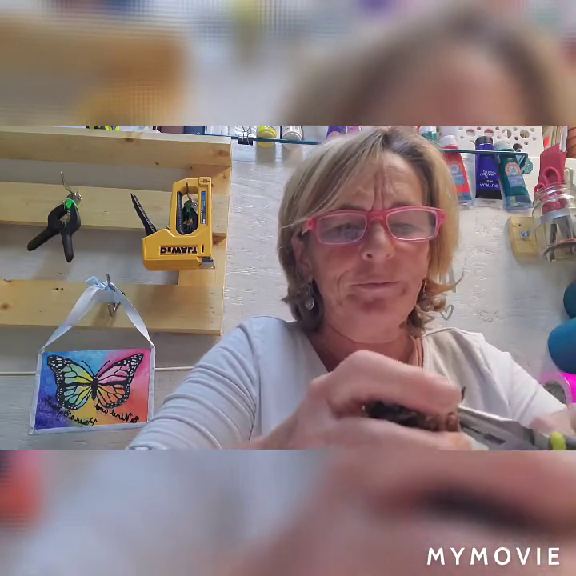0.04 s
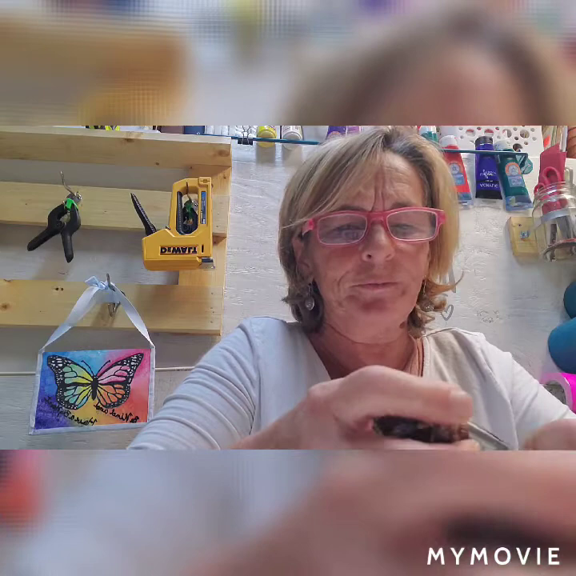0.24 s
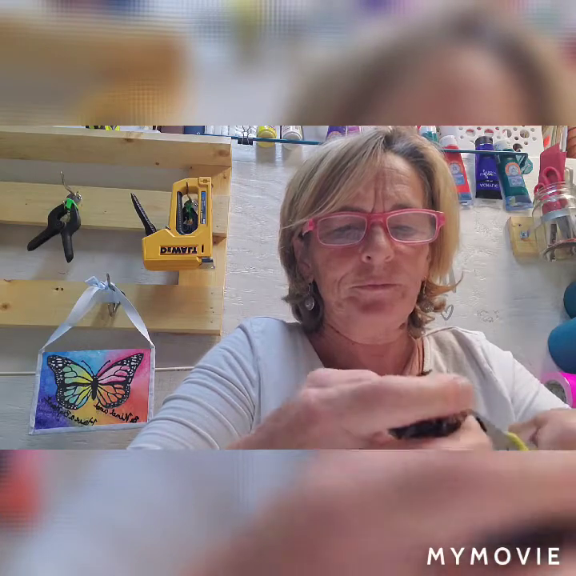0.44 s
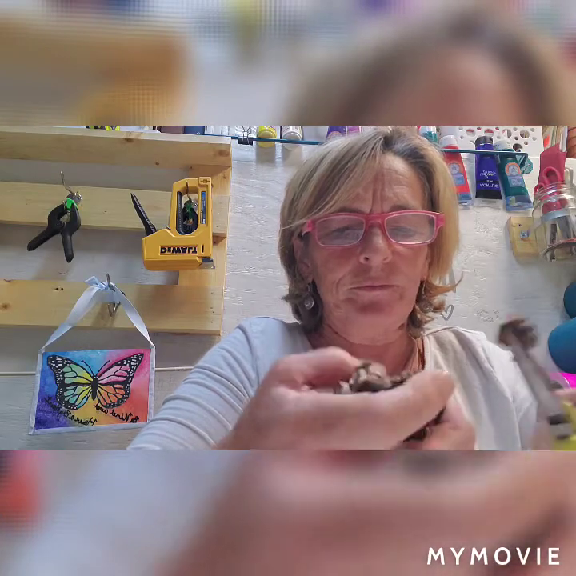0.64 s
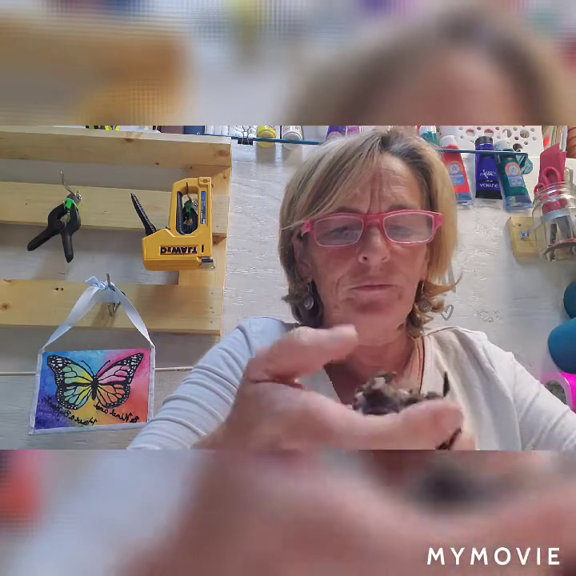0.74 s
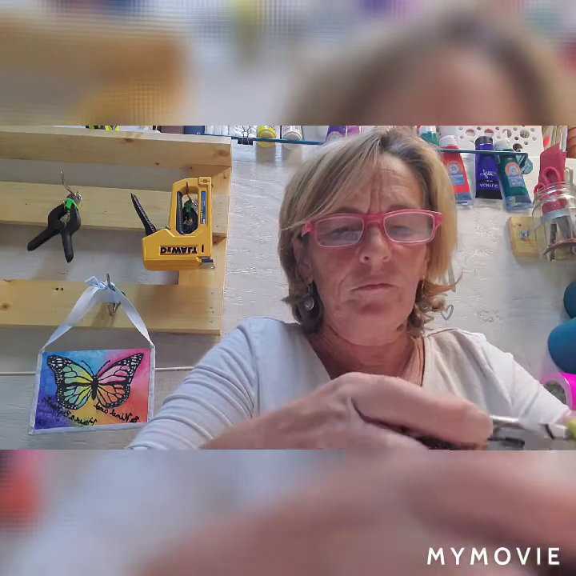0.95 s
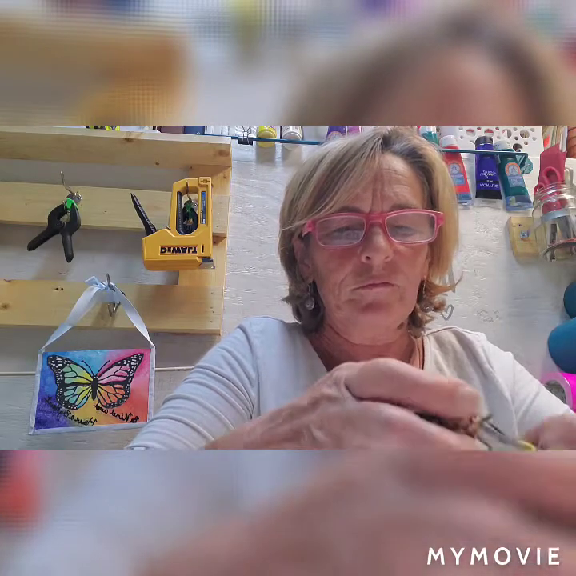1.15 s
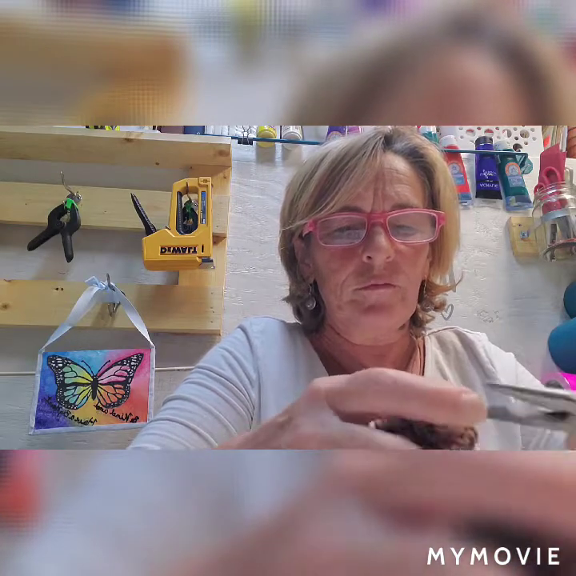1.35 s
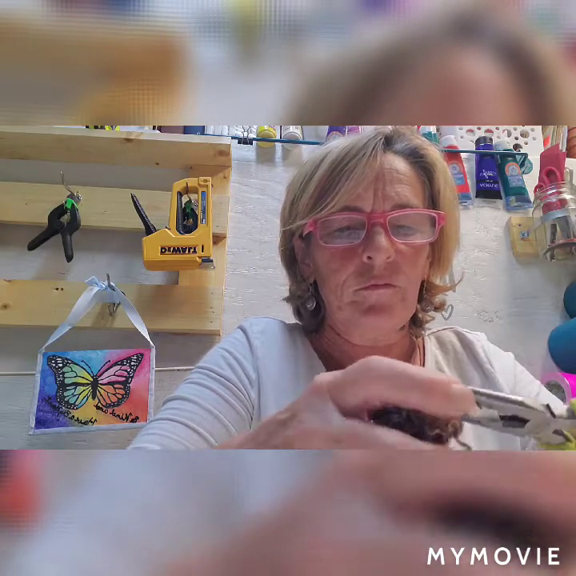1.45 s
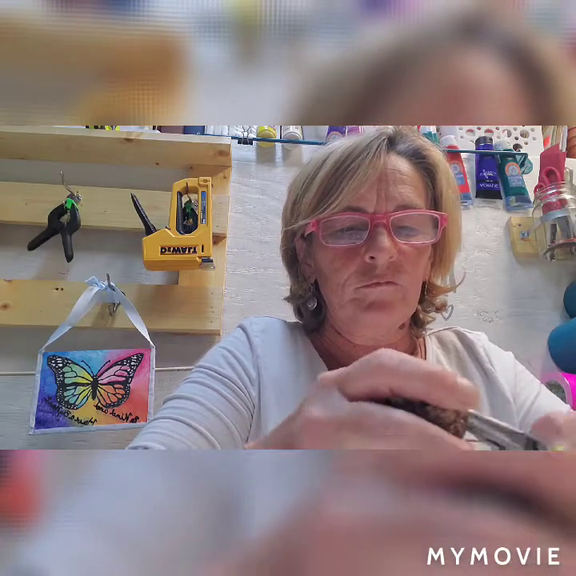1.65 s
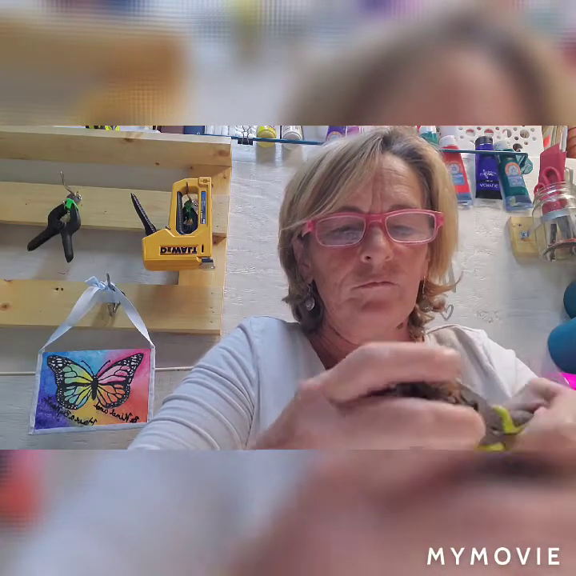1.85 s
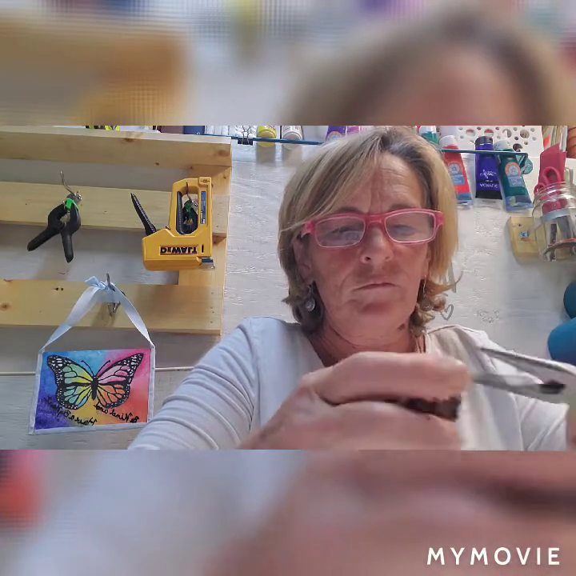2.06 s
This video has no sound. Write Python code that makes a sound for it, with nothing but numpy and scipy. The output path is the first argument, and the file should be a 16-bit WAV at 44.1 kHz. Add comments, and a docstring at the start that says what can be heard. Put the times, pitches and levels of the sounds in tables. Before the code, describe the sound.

Pliers break a dry pine cone apart with crisp woody snaps, crackling fibres and dropping scales

```python
"""Pulling a pine cone apart

Pliers pull the scales off a dry pine cone, close to the microphone in a small workroom.
Each scale gives way in snaps: short noisy bursts ringing in the woody cone, with clicking fibres between.
Loose scales drop and skitter on the bench, slightly drier than the cone, as bursts in its resonances.
Underneath lie a low motor-like hum of sines and dull room air of filtered noise."""
import sys
import numpy as np
from scipy import signal
from scipy.fft import rfft, irfft
from scipy.io import wavfile

SR = 44100
rng = np.random.default_rng(int(sys.argv[2]) if len(sys.argv) > 2 else 0)


def put_to_file(sound):
    """Save the sound as 16-bit audio at rate SR, in the file named by the first command-line argument."""
    columns = np.atleast_2d(sound).T  # one column per channel
    safe = np.clip(columns, -1, 1)
    whole_steps = np.round(safe * 32767)
    wavfile.write(sys.argv[1], SR, whole_steps.astype(np.int16))


N = 92301
T = np.arange(N) / SR  # seconds

# resonances of the fibres: centre_hz, width_hz, level_db
FIBRE_MODES = [(3080, 2300, -1.5), (4640, 220, -8.5), (6270, 770, 8), (9200, 720, -3), (10340, 640, -5.5),
               (12700, 1800, 2.5)]

PITCH_SCATTER, MODE_SCATTER_DB = 0.033, 4  # no two blows ring alike; pitch as a fraction
LEAD_S, RISE_S = 0.003, 0.00042  # time ahead of the sharp click; rise time of the noisy onset


def from_db(db):
    """Decibels to gain."""
    return 10 ** (np.asarray(db) / 20)


def rms_one(x):
    """Scale to rms 1."""
    return x / np.sqrt(np.mean(x ** 2) + 1e-20)


def energy_one(x):
    """Scale to energy 1."""
    return x / np.sqrt(np.sum(x ** 2) + 1e-20)


def add(out, start_s, x):
    """Mix x in at start_s, cut off at the end of the scene."""
    i = max(int(start_s * SR), 0)
    out[i:i + len(x)] += x[:max(N - i, 0)]


def noise(spectrum):
    """Noise with a spectrum of (Hz, dB) points; rms 1."""
    hz, db = np.transpose(spectrum)
    bin_hz = np.arange(N // 2 + 1) * SR / N
    gain = from_db(np.interp(np.log(bin_hz + 1), np.log(hz), db))
    return rms_one(irfft(rfft(rng.standard_normal(N)) * gain, N))


def resonate(x, modes, scatter=0., scatter_db=0.):
    """Parallel resonances of alternating sign, each a little off in pitch and strength if asked."""
    out = 0
    for k, (hz, width_hz, db) in enumerate(modes):
        radius = np.exp(-np.pi * width_hz / SR)  # a wider resonance dies sooner
        angle = 2 * np.pi * hz * (1 + scatter * rng.uniform(-0.68, 1)) / SR
        poles = [1, -2 * radius * np.cos(angle), radius * radius]
        mode = signal.lfilter([1, 0, -1], poles, x + 1e-18)
        gain = from_db(db + scatter_db * rng.normal())
        out = out + (-1) ** k * gain * energy_one(mode)
    return out


def blow(push, modes, db):
    """One push ringing in the modes; its whole energy equals db held for two milliseconds."""
    ring = resonate(push, modes, PITCH_SCATTER, MODE_SCATTER_DB)
    return from_db(db) * np.sqrt(0.002 * SR) * energy_one(ring)


def tuned(modes, pitch_hz):
    """The same modes on a larger or smaller scale, with the strongest at the given pitch."""
    strongest_hz = max(modes, key=lambda mode: mode[2])[0]
    return [(hz * pitch_hz / strongest_hz, width_hz, db) for hz, width_hz, db in modes]


def fracture(tear_s, share, size=1400):
    """A noisy onset swells briefly into a sharp click, LEAD_S in, and quickly dies away."""
    t = np.arange(size) / SR - LEAD_S
    envelope = np.exp(-np.abs(t) / np.where(t < 0, RISE_S, tear_s))
    push = share * rng.laplace(0, 1, size) * envelope
    push[int(LEAD_S * SR)] += 1
    return push


def clicks(length_s):
    """Random clicks of uneven size and either sign over faint noise, with time left to ring out."""
    per_s, spread_db = 650, 5
    t = T[:SR // 8]
    size_db = spread_db * np.minimum(rng.exponential(1, len(t)), 4)
    sizes = from_db(size_db) * rng.choice([-1, 1], len(t))
    born = rng.random(len(t)) < per_s / SR
    faint = 0.069 * rng.standard_normal(len(t))
    return (sizes * born + faint) * (t < length_s)


def snaps():
    """Each break excites four groups of modes, rings near its scale's pitch and leaves fibres settling."""
    # scales giving way: start_s, pitch_hz (of the ring), knock_db, crack_db, ring_db, splinter_db
    breaks = [(0.016, 6350, -31.5, -29.5, -38, -35), (0.0178, 6740, -56, -24, -23.5, -24),
              (0.087, 6230, -55, -42.5, -35, -36), (0.0985, 6000, -54, -45, -36, -34),
              (0.1248, 6120, -48, -30.5, -19, -24.5), (0.133, 6040, -42, -45, -28, -27.5),
              (0.1721, 6030, -48, -45, -29.5, -44), (0.2094, 6400, -48.5, -45, -37, -46),
              (0.254, 6200, -28, -29, -35, -23), (0.2555, 6610, -28, -23, -15.5, -25.5),
              (0.2727, 6350, -51, -39, -30.5, -30), (0.2768, 6000, -40.5, -34.5, -22.5, -33),
              (0.2868, 6330, -46, -38, -26, -35), (0.2919, 6400, -38.5, -30.5, -54, -39),
              (0.309, 6400, -39, -33, -42, -37), (0.3163, 6150, -59, -52, -24, -38),
              (0.331, 6740, -44, -35, -25.5, -33), (0.3569, 6400, -50, -51, -35, -45),
              (0.361, 6400, -37.5, -39, -26.5, -27.5), (0.366, 6500, -40, -30, -36, -26.5),
              (0.3927, 6300, -45.5, -43.5, -41, -31.5), (0.437, 6670, -28, -23.5, -25, -23.5),
              (0.4619, 6050, -42, -46, -40, -30), (0.5253, 5370, -46, -43, -31, -33),
              (0.5452, 6150, -38.5, -33, -18, -24), (0.5551, 5800, -38.5, -33, -42, -37),
              (0.5734, 7000, -31, -33, -27.5, -27.5), (0.8738, 6640, -36, -26.5, -25.5, -27.5),
              (0.9283, 6420, -46.5, -52, -29.5, -33.5), (1.049, 6300, -43, -38, -24, -27.5),
              (1.0685, 6350, -36, -26.5, -33, -28), (1.144, 6440, -31.5, -21.5, -25, -23),
              (1.16, 6840, -54, -48, -29.5, -30.5), (1.1976, 6300, -52, -38.5, -37, -39),
              (1.2203, 6200, -49, -38, -38, -38), (1.2443, 6530, -34.5, -29, -31, -30),
              (1.2513, 6230, -41, -26.5, -26.5, -37), (1.2526, 6260, -35.5, -32.5, -22, -21.5),
              (1.2914, 6800, -41, -33.5, -38, -37), (1.3211, 6350, -46, -50, -38, -32.5),
              (1.6541, 6600, -49.5, -49, -36.5, -37.5), (1.6783, 6280, -55, -59, -33, -56),
              (1.7386, 6870, -36, -35.5, -21.5, -27.5), (1.757, 6600, -34.5, -44, -38, -32),
              (1.7606, 6500, -32.5, -42, -33, -33), (1.783, 6780, -49, -42, -19, -30),
              (1.7871, 6600, -45, -35.5, -37, -40), (1.8104, 6840, -51, -42, -33, -44),
              (1.818, 6360, -44, -30.5, -28, -33), (1.8919, 6410, -50, -38.5, -26.5, -23),
              (2.0204, 6460, -57.5, -41, -28, -39)]
    # modes of the cone, from woody knock to splintering: centre_hz, width_hz, level_db
    knock = [(464, 86, -6), (866, 125, -5), (1137, 183, 1), (1498, 200, -1.5), (1885, 470, 3.5)]
    crack = [(2250, 580, -4.5), (3110, 450, 3.5), (4500, 780, 5.5)]
    scale_ring = [(5570, 910, -11), (6340, 350, 1), (7290, 1600, -8)]
    splintering = [(8420, 380, -9), (11040, 1430, -1.5), (12460, 550, 0.5), (14080, 730, 1.5),
                   (15650, 1200, -7)]
    # the splintering's highest treble against its lower part: time_s, level_db
    top_treble = [(.5, -2.5), (.87, -15), (1.05, 2.5), (1.6, -5.5), (1.78, -9), (1.89, 5)]
    top_treble_hz = 11500
    settle_s, settle_db = 0.031, -16.5  # level against the snap's splintering

    out = np.zeros(N)
    for start_s, pitch_hz, *levels_db in breaks:
        push = fracture(tear_s=0.0011, share=0.15)  # the fracture runs on after the sharp click
        top_db = np.interp(start_s, *np.transpose(top_treble))
        splinter = [(hz, width_hz, db + top_db * (hz > top_treble_hz)) for hz, width_hz, db in splintering]
        groups = (knock, crack, tuned(scale_ring, pitch_hz), splinter)
        for modes, db in zip(groups, levels_db):
            # keep the push from rumbling far below the group's lowest mode
            edge = signal.butter(3, 0.36 * modes[0][0], "high", fs=SR)
            add(out, start_s - LEAD_S, blow(signal.lfilter(*edge, push), modes, db))
        settling = clicks(settle_s)
        settling = settling * np.exp(-2 * T[:len(settling)] / settle_s)
        add(out, start_s, blow(settling, splinter, levels_db[-1] + settle_db))
    return out


def jaws_close():
    """The pliers' jaws snap shut as a scale comes free: one hollow knock."""
    # resonances of the closing jaws: centre_hz, width_hz, level_db
    jaw_modes = [(437, 120, -6.5), (1040, 98, 0.5)]
    out = np.zeros(N)
    add(out, 1.2532, blow(signal.unit_impulse(SR // 20), jaw_modes, db=-29))
    return out


def ticks():
    """Single fibres let go between the snaps, each a small bright fracture in the fibre modes."""
    # lone fibres: start_s, level_db (before the low cut)
    lone_fibres = [(0.1105, -34.5), (0.1344, -31), (0.178, -36), (.2018, -32.5), (0.2302, -32.5),
                   (0.2646, -32), (0.3426, -29.5), (0.3778, -35), (0.4807, -35), (0.9943, -44),
                   (1.012, -46), (1.0626, -35), (1.1276, -38), (1.1802, -39.5), (1.2123, -34),
                   (1.2788, -42), (1.522, -44), (1.595, -39), (0.644, -48), (1.7943, -35), (1.8709, -37)]
    out = np.zeros(N)
    for start_s, db in lone_fibres:
        add(out, start_s - LEAD_S, blow(fracture(tear_s=0.0017, share=0.23), FIBRE_MODES, db))
    return out


def fibre_grains(length_s):
    """A clump of tiny clicks; some excite every fibre resonance, most only one. Energy 1."""
    shared = 0.21 * clicks(length_s)
    out = 0
    for k, mode in enumerate(FIBRE_MODES):
        out = out + (-1) ** k * resonate(shared + clicks(length_s), [mode], PITCH_SCATTER)
    return energy_one(out)


def crackle():
    """Fibres part in clumps of clicks; sparse touches of shifting fingers tick faintly throughout."""
    # stretches of crackling: start_s, length_s, level_db (before the low cut)
    stretches = [(0.142, 0.077, -46.5), (0.248, 0.094, -50), (0.36, 0.031, -44.5), (0.446, 0.067, -42.5),
                 (0.531, 0.07, -43.5), (0.606, 0.016, -48), (0.674, 0.03, -54), (0.928, 0.018, -45),
                 (1.147, 0.074, -50.5), (1.236, 0.02, -44), (1.29, 0.044, -71), (1.331, 0.0061, -40),
                 (1.584, 0.022, -48.5), (1.729, 0.015, -45), (1.741, 0.037, -41), (1.946, 0.024, -53.5),
                 (2.051, 0.04, -53)]
    touches_per_s, handling_db = 99, -74.5
    touches = rng.laplace(0, 1, N) * (rng.random(N) < touches_per_s / SR)
    out = from_db(handling_db) * rms_one(resonate(touches, FIBRE_MODES))
    for start_s, length_s, db in stretches:
        add(out, start_s, from_db(db) * np.sqrt(length_s * SR) * fibre_grains(length_s))
    return out


def drops():
    """Loose scales tick and bounce in the bench's modes; one skitters, its dense contacts dying away."""
    # landings and bounces: start_s, pitch_hz, level_db
    landings = [(0.8759, 3070, -28), (0.911, 3960, -42.5), (0.95, 2050, -47.5), (1.367, 3030, -30),
                (1.376, 2710, -38), (1.4019, 4650, -43.5), (1.4295, 2880, -25), (1.436, 2780, -35),
                (1.46, 2920, -31), (1.4756, 2790, -31.5), (1.483, 2630, -41), (1.510, 3000, -41)]
    # a loose scale on the bench: centre_hz, width_hz, level_db
    bench_modes = [(860, 480, -14.5), (1670, 67, -21), (2350, 680, -8), (2900, 320, 0.5), (3300, 760, -7),
                   (4260, 650, -7.5), (6300, 710, -11.5), (9600, 3300, -13.5)]
    skitter_at_s, skitter_db, skitter_t60_s = 0.879, -31.5, 0.16
    damping = 6.2  # sliding contact widens the scale's resonances

    out = np.zeros(N)
    for start_s, pitch_hz, db in landings:
        push = fracture(tear_s=0.003, share=0.12)
        add(out, start_s - LEAD_S, blow(push, tuned(bench_modes, pitch_hz), db))
    contacts = rng.laplace(0, 1, N) * (rng.random(N) < 0.07)
    contacts = contacts * from_db(-60 * T / skitter_t60_s)
    damped = [(hz, width_hz * damping, db) for hz, width_hz, db in bench_modes]
    add(out, skitter_at_s, blow(contacts, damped, skitter_db))
    return out


def room(x):
    """Quick sparse reflections from hands and bench, with a tail of noise bands that decay separately."""
    # the room's answer by band: upper_edge_hz, level_db (per Hz, relative), t60_s
    bands = [(1170, 18.5, 0.077), (2680, 7.5, 0.23), (5800, 14, 0.11), (8700, -2.5, 0.31),
             (18600, 6.5, 0.2)]
    tail_db, near_db, near_t60_s, first_echo_s = -18, -13.5, 0.043, 0.0025
    tail, low_hz = 0, 200
    for high_hz, db, t60_s in bands:
        sos = signal.butter(3, [low_hz, high_hz], "band", fs=SR, output="sos")
        band = signal.sosfilt(sos, rng.standard_normal(N))
        tail = tail + band * from_db(db - 60 * T / t60_s)
        low_hz = high_hz
    near = rng.standard_normal(N) * (rng.random(N) < 0.05) * from_db(-60 * T / near_t60_s)
    late = T > first_echo_s
    answer = from_db(tail_db) * energy_one(tail * late) + from_db(near_db) * energy_one(near * late)
    return signal.fftconvolve(x, answer)[:N]


def hum():
    """Sines at multiples of a turning rate, steady at first, then weaker, lower and wavering."""
    # harmonics: multiple (of the turning rate), level_db (while steady)
    harmonics = [(2, -51), (3, -53), (4, -63)]
    turning_hz, waver_hz, sag_hz = 29.64, 2.9, 1.15  # all times the multiple
    unsteady_from_s, unsteady_db = 0.9, -1.5
    unsteady, out = np.clip((T - unsteady_from_s) / 0.04, 0, 1), 0
    for multiple, db in harmonics:
        waver = noise([(1, 0), (6, 0), (20, -40), (100, -120)])  # slow, mostly below 6 Hz
        hz = multiple * (turning_hz + unsteady * (waver_hz * waver - sag_hz))
        cycles = np.cumsum(hz) / SR + rng.random()
        out = out + from_db(db + unsteady_db * unsteady) * np.sqrt(2) * np.sin(2 * np.pi * cycles)
    return out


def air():
    """Dull noise for the room air, with a second noise whose low mids dip, swell and fade."""
    # steady air: frequency_hz, level_db (per Hz, relative)
    air_colour = [(25, -5.5), (52, 4), (95, 1.5), (160, -8.5), (240, -2.5), (400, -8), (700, -16.5),
                  (1600, -32), (3000, -30.5), (13000, -39), (16000, -42)]
    # colour of the low mids: frequency_hz, level_db (per Hz, relative)
    mids_colour = [(150, -17), (350, 2), (620, -3), (1600, -22.5), (3200, -19.5), (12000, -63)]
    # level of the low mids: time_s, level_db
    mids_level = [(0, -59.5), (.45, -67.5), (.6, -52.5), (.85, -59.5), (.98, -70), (2.09, -81)]
    swell = from_db(np.interp(T, *np.transpose(mids_level)))
    return from_db(-52.5) * noise(air_colour) + swell * noise(mids_colour)


def scene():
    """Cone close by, bench beside it, slightly drier, room around them."""
    # thin fibres radiate little low sound
    low_cut = signal.butter(2, 1600, "high", fs=SR)
    fibres = signal.lfilter(*low_cut, ticks() + crackle())
    cone = snaps() + jaws_close() + fibres
    bench = drops()
    bench_to_room_db = -1.5
    echoes = room(cone + from_db(bench_to_room_db) * bench)
    return (cone + bench + echoes + hum() + air())[None]


def record(dry):
    """The top is cut steeply above 15.9 kHz."""
    return signal.sosfilt(signal.ellip(10, 0.2, 80, 15900, fs=SR, output="sos"), dry)


dry = scene()
out = record(dry)
put_to_file(out)
```